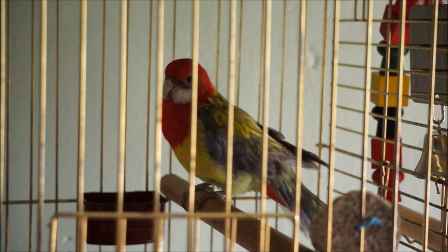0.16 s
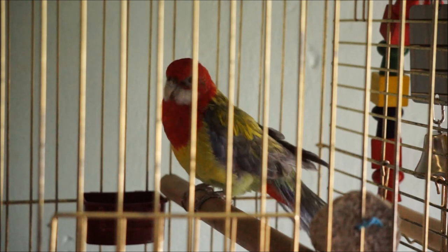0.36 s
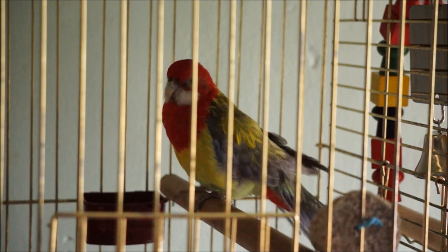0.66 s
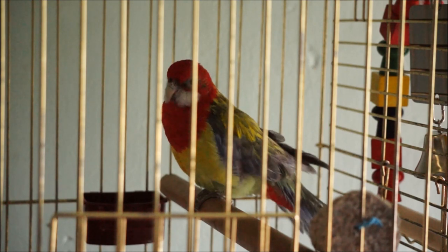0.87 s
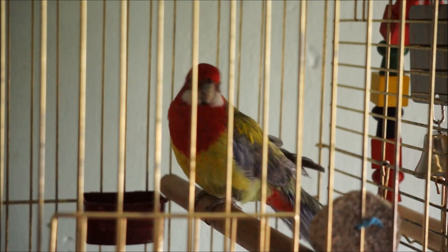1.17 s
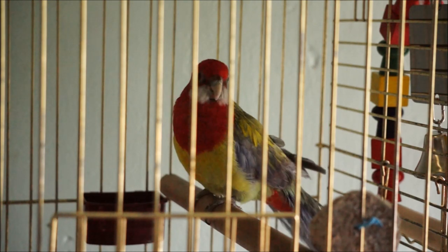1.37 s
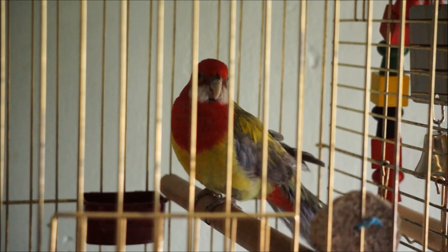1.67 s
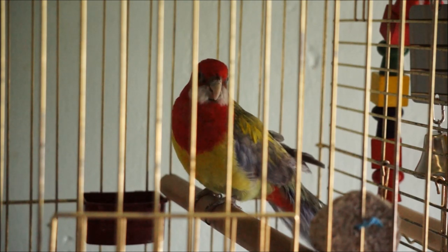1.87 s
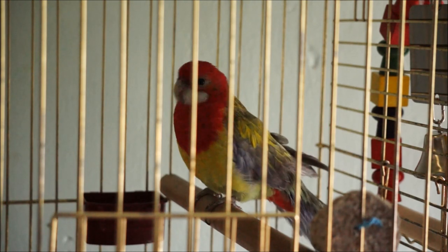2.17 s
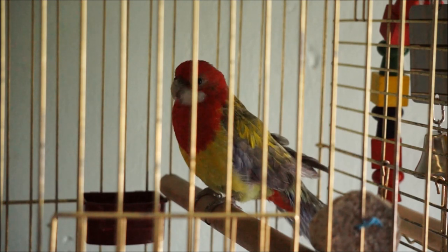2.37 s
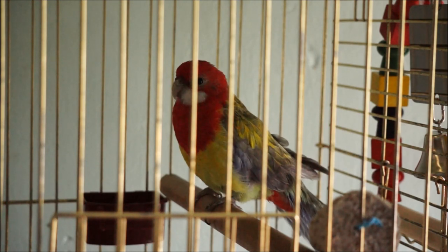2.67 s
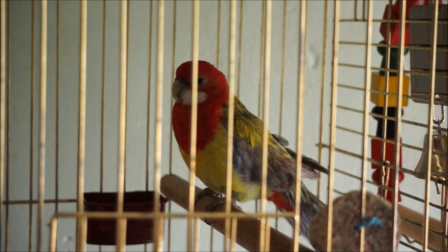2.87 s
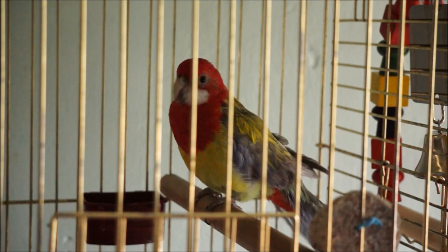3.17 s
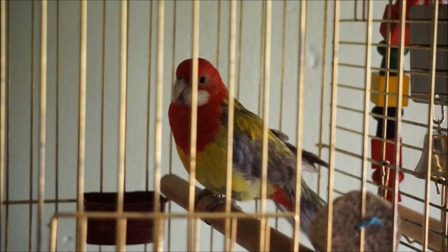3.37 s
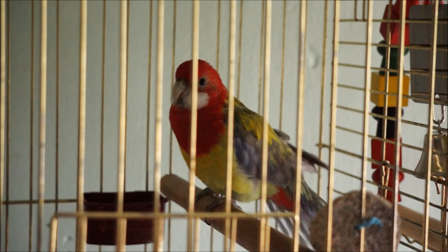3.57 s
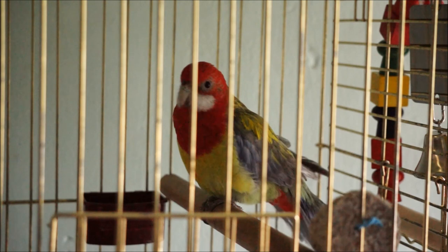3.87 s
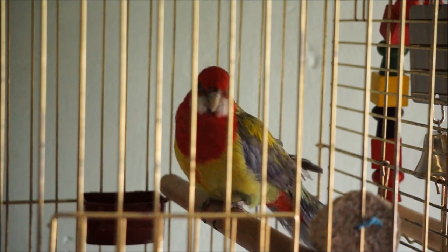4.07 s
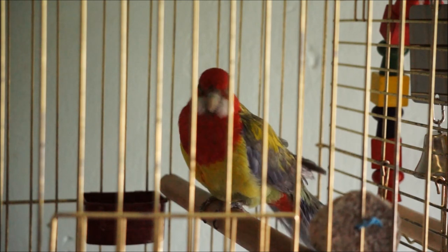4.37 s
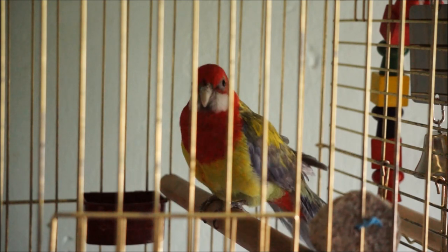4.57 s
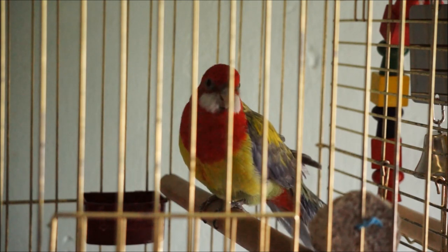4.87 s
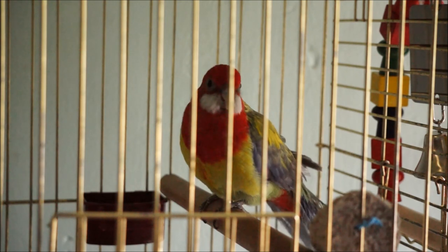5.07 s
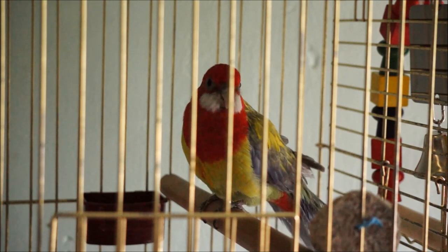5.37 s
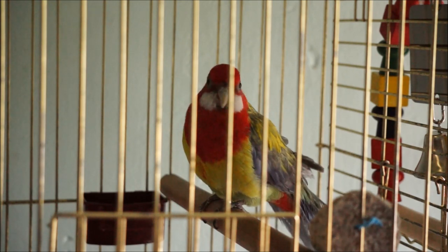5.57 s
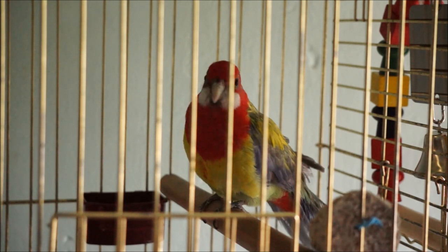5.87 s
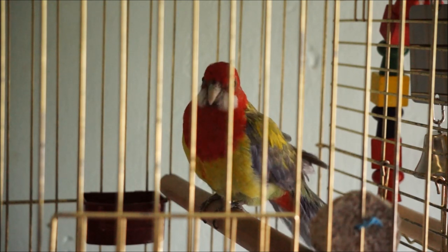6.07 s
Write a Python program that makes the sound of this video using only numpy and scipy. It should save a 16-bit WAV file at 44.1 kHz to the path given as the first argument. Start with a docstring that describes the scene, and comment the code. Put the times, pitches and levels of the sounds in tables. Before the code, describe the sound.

A parrot calls from its cage, close to a stereo microphone in a small quiet room with a very faint hush. At 0 s a sharp chirp sounds with a soft pure whistle, another chirp follows at 0.13, then sliding squawks and harsh rasps alternate until about 0.8. A gentle whistle swells around 0.9. A rasp at 1.35 leads into three longer, nasal, two-step squawks from 1.5 to 2.05, with whistle again near 2.1. The bird then pauses for about a second. A soft whistle at 3.05 opens five bright chirps, each breaking into a hoarse warble, until 3.85. Faint whistles come around 4.1 to 4.25, then rasp, slur, rasp and two nasal drawls from 4.35 to 5.15. Weak whistles fade near 5.3. After a quiet gap, a clear falling squawk at 5.9, a harsh rasp at 6.07 and a soft whistle at 6.2 close it, with short room ring.

```python
"""Caged parrot, quiet room

A parrot chatters in its cage in a small, quiet room, close to a two-port microphone.
Each squawk is a chirp, slur, rasp or drawl: overtones swept by the syrinx, rough when low and clear when high.
Soft, steady whistles, nearly pure tones, come with the first squawk, among the others and after the last.
Cage bars and the room return both, near walls echo the squawks, and a faint hush lies underneath."""
import sys
import numpy as np
from scipy import signal
from scipy.fft import rfft, irfft, next_fast_len
from scipy.io import wavfile
from scipy.ndimage import uniform_filter1d, minimum_filter1d

SR = 44100
rng = np.random.default_rng(int(sys.argv[2]) if len(sys.argv) > 2 else 0)


def store_pcm(level_fs):
    """Save levels as 16-bit WAV."""
    pcm = np.round(np.clip(level_fs, -1, 1) * 32767).astype(np.int16)
    wavfile.write(sys.argv[1], SR, np.atleast_2d(pcm).T)


N = 273861  # length [samples]


def amp(db):
    """Decibels to gain."""
    return 10 ** (np.asarray(db) / 20)


def evened(x):
    """Scales to rms 1."""
    return x / np.sqrt(np.mean(x ** 2) + 1e-20)


def read(points, hz):
    """Reads a table on a log-frequency axis."""
    f, value = np.transpose(points)
    return np.interp(np.log(hz + 1), np.log(f + 1), value)


def add(mix, s, sound):
    """Lays a sound into the mix at time s."""
    part = mix[max(round(s * SR), 0):][:len(sound)]
    part += sound[:len(part)]


def colour(x, points):
    """Filters by a table of (frequency [Hz], gain [dB])."""
    n = x.shape[-1]
    return irfft(rfft(x) * amp(read(points, np.fft.rfftfreq(n, 1 / SR))), n)


def flutter(size, rate_hz):
    """Random wavering up to about rate_hz, rms 1."""
    n = next_fast_len(size)
    hz = np.fft.rfftfreq(n, 1 / SR)
    slow = rfft(rng.standard_normal(n)) / (1 + (hz / rate_hz) ** 2)
    return evened(irfft(slow, n)[:size])


def gesture(rows, attack, release):
    """Joins a call's corners by straight lines: sample numbers, a gate with soft ends, and the columns."""
    s, *columns = np.transpose(rows)
    s = np.maximum.accumulate(s)
    first = max(int((s[0] - attack / 2) * SR), 0)
    last = min(int((s[-1] + release) * SR), N)
    at = np.arange(first, last)
    t = at / SR
    opening = np.clip((t - s[0]) / attack + .5, 0, 1)
    closing = np.clip((s[-1] + release - t) / release, 0, 1)
    return at, opening * closing, [np.interp(t, s, c) for c in columns]


def ports(pair, likeness):
    """Makes two unrelated signals as alike as the two microphone ports hear them."""
    n = pair.shape[-1]
    same = np.clip(read(likeness, np.fft.rfftfreq(n, 1 / SR)), -1, 1)
    a, b = rfft(pair)
    mid = a * np.sqrt((1 + same) / 2)
    side = b * np.sqrt((1 - same) / 2)
    return irfft(np.array([mid + side, mid - side]), n)


# the quiet room and the microphone's hiss, relative spectrum: (frequency [Hz], density [dB per Hz])
HUSH_SPECTRUM = [(15, -17), (30, -0.5), (90, -3), (150, 0.5), (220, -1.5), (400, -1), (800, -2), (1500, -3),
                 (2200, -6.5), (5500, -11.5), (10000, -17.5), (14000, -18.5), (16000, -30.5)]


def hush(level_db=-64, likeness=((100, .9), (400, .65), (3000, .4))):
    """Faint steady room noise and hiss: coloured noise, most alike at the two ports in the bass."""
    pair = rng.standard_normal((2, next_fast_len(N)))
    return amp(level_db) * evened(colour(ports(pair, likeness), HUSH_SPECTRUM)[:, :N])


# swells of the whistle, before its overall trim; octave and overtones [dB] offset the level, ring [dB] too:
# (start [s], rise [s], hold [s], pitch [Hz], level [dB], octave [dB], higher overtones [dB], ring [dB])
WHISTLE_SWELLS = [ (0.0, 0.0015, .012, 1601, -13, -48, 3, -1.5),
                  (0.826, 0.059, .012, 1648, -11.5, -50, -2.5, -13),
                  (0.909, 0.065, .044, 1639, -12.3, -47, 2, -12.5),
                  (2.043, 0.049, .016, 1641, -15, -43, 1.5, -18),
                  (2.112, 0.028, .05, 1646, -19.5, -49, -7, -26), (2.23, .045, .03, 1645, -36, -53, -6, -9),
                  (3.029, 0.05, 0.11, 1626, -15, -53.5, -6, -22),
                  (4.064, .085, 0.021, 1636, -24.5, -40.5, 1.5, -4.5),
                  (4.165, 0.034, .028, 1640, -30, -17, -2.5, -9),
                  (4.229, 0.022, 0.011, 1644, -27, -30, -4.5, -4.5),
                  (5.152, 0.046, 0.1, 1659, -33.5, -13.5, -8, -12.5),
                  (5.273, .03, .025, 1638, -23.5, -24, 0, -4), (5.31, .04, .07, 1637, -33, -39.5, -9, -12),
                  (6.168, 0.054, .012, 1670, -21.5, -26, 0, -15), ]
# the 3rd to 6th partials against the fundamental, before each swell's overtone offset: (level [dB])
WHISTLE_OVERTONES = [-44, -57, -48, -61]


def whistles(level_db=-1, jitter=0.0031, attack=0.0038, swell_from_db=-22.5, stop_db_per_s=380,
             ring_db_per_s=140):
    """One nearly pure tone near one pitch swells, holds, stops quickly and leaves a weaker, slower ring."""
    t, gains = np.arange(N) / SR, np.zeros((3, N))
    for s, rise, hold, _, db, octave_db, higher_db, ring_db in WHISTLE_SWELLS:
        at = (t >= s) & (t < s + 1)
        age = t[at] - s
        after = np.maximum(age - rise - hold, 0)
        swell_db = swell_from_db * np.clip(1 - age / rise, 0, 1) ** 2
        fade_db = np.maximum(-stop_db_per_s * after, ring_db - ring_db_per_s * after)
        level = np.minimum(age / attack, 1) * amp(db + swell_db + fade_db)
        swell = [level, amp(octave_db) * level, amp(higher_db) * level]
        gains[:, at] = np.maximum(gains[:, at], swell)
    # each pitch stands from the swell's start to the end of its hold, then glides to the next
    held = [(s + lag, hz) for s, rise, hold, hz, *_ in WHISTLE_SWELLS for lag in (0, rise + hold)]
    hz = np.interp(t, *np.transpose(sorted(held)))
    phase = 2 * np.pi * np.cumsum(hz * (1 + jitter * flutter(N, rate_hz=80))) / SR
    first, octave, higher = gains
    partials = [first, octave] + [higher * amp(db) for db in WHISTLE_OVERTONES]
    tone = sum(gain * np.sin((k + 1) * phase) for k, gain in enumerate(partials))
    return amp(level_db) * np.sqrt(2) * tone


# the windpipe's resonance, on the fundamental and the octave: (frequency [Hz], gain [dB])
WINDPIPE_RESONANCE = [(850, -10), (1050, -13), (1250, -12), (1450, -4.5), (1700, -2.5), (2100, 0.5),
                      (2400, -2), (2800, 0.5), (3200, -3), (3600, -8), (4100, -24), (4600, -28.5),
                      (5500, -21.5)]


def syrinx(corners, throat, air_colour, rasp_db, low_hz, jitter, clear_hz, half_db=-60, buzz_db=-0.5,
           shimmer=0.079, uneven_db=3.0, clear_share=0.11, burst=0.97, burst_s=.006):
    """The syrinx sweeps a stack of overtones; at low pitch its membranes beat unevenly and air rasps through."""
    out, under, k = np.zeros(N), np.zeros(N), np.arange(1, 17)[:, None]
    at, gate, (hz, effort, lean, buzz) = gesture(corners, attack=.003, release=.006)
    first = effort + read(WINDPIPE_RESONANCE, hz)
    octave = effort + lean + read(WINDPIPE_RESONANCE, 2 * hz)
    waver, tremble = flutter(len(at), rate_hz=300), flutter(len(at), rate_hz=570)
    air_points = [(500, -6.5), (1100, 2.5), (2600, 14.5)] + list(air_colour)
    air = evened(colour(rng.standard_normal(len(at)), air_points))
    # roughness sinks from 1 to clear_share as the pitch climbs past clear_hz
    rough = clear_share + (1 - clear_share) / (1 + (hz / clear_hz) ** 10)
    phase = 2 * np.pi * np.cumsum(hz * (1 + jitter * rough * waver)) / SR
    partial_db = np.vstack([first, octave, buzz + buzz_db + read(throat, k[2:] * hz)])
    # the shape of the beat keeps changing, so each overtone swells and sinks on its own
    drift = uniform_filter1d(uniform_filter1d(rng.standard_normal(partial_db.shape), size=200), size=200)
    partial_db = partial_db + uneven_db * rough * evened(drift)
    audible = k * hz < SR / 2  # no partials above half the sample rate
    voice = np.sqrt(2) * (amp(partial_db) * audible * np.sin(k * phase)).sum(0)
    puff = 1 + burst * np.exp(-(at - at[0]) / SR / burst_s)  # air bursts through as the syrinx opens
    hiss = amp(buzz + rasp_db) * rough * puff * air
    add(out, at[0] / SR, gate * (voice * (1 + shimmer * rough * tremble) + hiss))
    # strong and weak beats alternate a little: a faint line at half the pitch
    add(under, at[0] / SR, gate * rough * amp(octave + half_db) * np.sin(phase / 2))
    # so small a beak radiates no bass
    no_bass = signal.butter(8, low_hz, "high", fs=SR, output="sos")
    return signal.sosfilt(no_bass, out + 1e-18) + under


# Call tables give nominal pitches and levels, which the corners below shift a little; levels are taken
# before windpipe, throat and overall trim. Octave [dB] offsets the fundamental; buzz [dB] is the higher overtones.


def chirp(s, note_s, warble_s, entry_hz, note_hz, warble_hz, note_db, warble_db, note_octave_db, octave_db,
          buzz_db, settle_s=0.0083, break_s=.005, dip=.89, sag=0.73):
    """The note settles, breaks downward, and warbles in one arch.

    Corners, as in every call: (time [s], pitch [Hz], effort [dB], octave [dB], buzz [dB])."""
    snap = s + note_s
    settled_hz = note_hz + 0.19 * (entry_hz - note_hz)
    return [(s, entry_hz, note_db - 1.5, note_octave_db - 6.5, buzz_db - 3),
            (s + settle_s, settled_hz, note_db + .5, note_octave_db - 0.5, buzz_db - 1.0),
            (snap, note_hz, note_db, note_octave_db, buzz_db + 4.5),
            (snap + break_s, warble_hz * .98, warble_db + 1.5, octave_db - 4.5, buzz_db - 2),
            (snap + 2 * break_s, warble_hz * dip, warble_db - .5, octave_db + 3.0, buzz_db + .5),
            (snap + .47 * warble_s, warble_hz, warble_db, octave_db + 0.5, buzz_db + 0.23),
            (snap + 0.89 * warble_s, warble_hz * .93, warble_db + .8, octave_db, buzz_db - 1.9),
            (snap + warble_s, warble_hz * sag, warble_db - 2.5, octave_db, buzz_db - 11)]


# chirps: (start [s], note [s], warble [s], entry [Hz], note [Hz], warble [Hz], note [dB], warble [dB],
# note's octave [dB], warble's octave [dB], buzz [dB], half-pitch line against the octave [dB])
CHIRP_CALLS = [ (0.0, .02, .044, 2151, 2129, 1686, -11, -10, -3.5, -27, -36.5, -62.5),
               (.133, 0.029, .046, 2227, 1968, 1527, -9.5, -14, 6, -1, -29.5, -59),
               (3.148, .022, .048, 2202, 2158, 1543, -13.5, -12, -12, -9, -34.5, -59.5),
               (3.286, .03, .044, 2260, 2234, 1604, -4, -14, -1, -0.5, -28, -58),
               (3.427, .029, .048, 2314, 2273, 1520, -5.5, -16.5, -0.5, 2.5, -29, -47),
               (3.576, 0.027, .058, 2222, 1994, 1453, -7, -16, 6.5, 3.5, -26.5, -38),
               (3.736, .028, .053, 2260, 2021, 1447, -10, -17.5, 8, 3, -28, -58), ]
# throat and beak on a chirp's higher overtones: (frequency [Hz], gain [dB])
CHIRP_COLOUR = [(4000, 0.5), (4700, -13), (5500, -26), (6400, -17.5), (7300, -15.5), (8400, 2.5),
                (9800, -9.5), (11500, -1), (12700, -6), (13800, -23), (15500, -28)]


def chirps():
    """A loud clear note breaks down into a hoarse warble as the pitch falls below the clear register."""
    return sum(syrinx(chirp(*row), CHIRP_COLOUR, CHIRP_COLOUR, rasp_db=-8, low_hz=1250, jitter=.015,
                      clear_hz=1780, half_db=half_db)
               for *row, half_db in CHIRP_CALLS)


def slur(s, flick_s, glide_s, top_hz, middle_hz, end_hz, flick_db, glide_db, octave_db, scratch_db, buzz_db,
         start_hz=915, leap_hz=1240, settle_s=.007, droop_s=.012, droop=.91):
    """The pitch climbs, leaps into the clear register, slides down, and droops as the voice closes."""
    top = s + flick_s
    return [(s, start_hz, flick_db - 2, 0, scratch_db - 5.5),
            (s + 0.65 * flick_s, leap_hz, flick_db + 1.5, -2.5, scratch_db + 1.0),
            (top, top_hz * 0.85, glide_db - 1.5, octave_db + 3, scratch_db - 2.0),
            (top + settle_s, top_hz, glide_db - 3.5, octave_db + 3.5, buzz_db - 2.0),
            (top + .5 * glide_s, middle_hz, glide_db + 0.93, octave_db, buzz_db - .3),
            (top + glide_s - droop_s, end_hz, glide_db + 0.51, octave_db - 3.0, buzz_db - .4),
            (top + glide_s, end_hz * droop, glide_db - 2.0, octave_db - 8.5, buzz_db - 5.5)]


# slurs: (start [s], flick [s], glide [s], top [Hz], middle [Hz], end [Hz], flick [dB], glide [dB],
# octave [dB], scratch: the flick's buzz [dB], buzz [dB])
SLUR_CALLS = [ (.273, .018, 0.079, 2114, 1913, 1836, -16.5, -13, -11.5, -37.5, -34.5),
              (.579, .019, 0.089, 2080, 1873, 1810, -17.5, -15, -15.5, -35, -37),
              (4.484, .019, .08, 2082, 1875, 1753, -17.5, -15, -9, -29.5, -35),
              (5.904, .013, .092, 2028, 1923, 1880, -25.5, -17.5, -25.5, -57, -45.5), ]
# throat and beak on a slur's higher overtones: (frequency [Hz], gain [dB])
SLUR_COLOUR = [(3000, 8.5), (4000, 1.5), (5500, -12), (6700, -10), (7900, 3), (9600, -13.5), (11400, 6),
               (12600, -7.5), (13800, -14), (15500, -13)]
# throat and beak on a rasp's higher overtones, also on a slur's air: (frequency [Hz], gain [dB])
RASP_COLOUR = [(3100, 10), (4100, -1), (5100, 2), (6300, 1.5), (7200, -0.5), (8300, 3.5), (9600, -5),
               (11300, -0.5), (12600, -8), (13800, -16.5), (15500, -22)]


def slurs():
    """A scratchy flick upward, full of rasping air, then a clear falling glide."""
    return sum(syrinx(slur(*row), SLUR_COLOUR, RASP_COLOUR, rasp_db=13, low_hz=760, jitter=.0083,
                      clear_hz=1453, clear_share=.02)
               for row in SLUR_CALLS)


def gaped(throat, gape_db, trade=0.37, shut_hz=4100, open_hz=5700, width_hz=1000):
    """An opening beak shifts resonance upward: the upper one gains gape_db, the lower loses a share of it."""
    hz = np.geomspace(3000, 16000, num=60)
    shut = np.exp(-((hz - shut_hz) / width_hz) ** 2)
    opened = np.exp(-((hz - open_hz) / width_hz) ** 2)
    return list(zip(hz, read(throat, hz) + gape_db * (opened - trade * shut)))


def rasp(s, length, drone_hz, top_hz, shelf_hz, end_hz, drone_db, fall_db, octave_db, drone_buzz_db, buzz_db,
         top_db=-16, top_s=.004, slowing=.34, drone_end_s=0.013, flick_top_s=.021, shelf_start_s=.029,
         shelf_end_s=.042):
    """The drone swells and flicks up; from the shelf the pitch falls, fast at first and then slower."""
    top, shelf_end, end = s + flick_top_s, s + shelf_end_s, s + length
    bend = shelf_end + 0.34 * (end - shelf_end)
    bend_hz = end_hz + slowing * (shelf_hz - end_hz)
    return [(s, drone_hz * .99, drone_db - 3.5, 0, drone_buzz_db - 5),
            (s + drone_end_s, drone_hz * 1.01, drone_db, 0, drone_buzz_db),
            (top - top_s / 2, top_hz * 0.88, top_db, -1.5, buzz_db + 0.37),
            (top + top_s / 2, top_hz * .96, top_db, -1.5, buzz_db - .4),
            (s + shelf_start_s, shelf_hz, fall_db, octave_db, buzz_db + .3),
            (shelf_end, shelf_hz * .995, fall_db + 0.5, octave_db + 1, buzz_db - .3),
            (bend, bend_hz, fall_db - .8, octave_db - 4, buzz_db - 1.5),
            (end, end_hz, fall_db - 5.5, octave_db - .8, buzz_db - 13)]


# rasps: (start [s], length [s], drone [Hz], top [Hz], shelf [Hz], end [Hz], drone [dB], fall [dB],
# octave [dB], drone's buzz [dB], buzz [dB], gape [dB])
RASP_CALLS = [ (0.432, 0.075, 1027, 2919, 1625, 1183, -14, -17, 3, -25, -25, 2),
              (0.75, .071, 1044, 2747, 1588, 1188, -14.5, -16.5, 3, -28.5, -26, 2),
              (1.347, .078, 936, 2832, 1725, 1318, -29, -16, -3, -46, -36.5, -3.5),
              (4.343, 0.083, 912.6, 2756, 1740, 1211, -24, -17.5, 5.5, -45.5, -30, -10.5),
              (4.644, 0.067, 1030, 2643, 1577, 1195, -15.5, -18, 8.5, -26, -26, -14.5),
              (6.07, 0.061, 1017, 2926, 1542, 1215, -15.5, -14, -0.5, -31, -25.5, 0), ]


def rasps():
    """A low drone, a flick to the top of the voice, a shelf and a harsh fall, each with its own gape."""
    calls = np.zeros(N)
    for *row, gape_db in RASP_CALLS:
        throat = gaped(RASP_COLOUR, gape_db)
        calls += syrinx(rasp(*row), throat, throat, rasp_db=-4.5, low_hz=860, jitter=.011, clear_hz=2580)
    return calls


def drawl(s, length, shelf_s, start_hz, low_hz, crest_hz, shelf_hz, tail_hz, rise_db, shelf_db, tail_db,
          rise_buzz_db, buzz_db, climb=.2, thin_db=-8, drop_s=0.0052, crest_s=.043, step_s=.014):
    """The pitch climbs ever faster, thins past the crest, rests on a shelf and a tail, and drops at the close."""
    crest, step, end = s + crest_s, s + shelf_s, s + length
    climb_hz = low_hz + climb * (crest_hz - low_hz)
    return [(s, start_hz, rise_db - 8, -1.5, rise_buzz_db - 5.5),
            (s + .29 * crest_s, low_hz, rise_db + 1.0, -.3, rise_buzz_db),
            (s + .58 * crest_s, climb_hz, rise_db - .6, .3, rise_buzz_db - 4),
            (crest, crest_hz, rise_db - 7.5, 4, rise_buzz_db - 6.5),
            (crest + .6 * step_s, (crest_hz + shelf_hz) / 2, shelf_db + thin_db, -3, buzz_db - 15),
            (crest + 1.6 * step_s, shelf_hz, shelf_db + .3, -1.5, buzz_db - 1.5),
            (step, shelf_hz * .985, shelf_db + 0.32, -1.5, buzz_db + 0.65),
            (step + step_s, tail_hz * 1.04, tail_db - 6.5, -1.5, buzz_db - .3),
            (step + 2 * step_s, tail_hz, tail_db + 1.1, -.8, buzz_db - 1.0),
            (end - drop_s, tail_hz * .985, tail_db + .3, -1.5, buzz_db - 8.5),
            (end, tail_hz * .77, tail_db - 8.5, -4, buzz_db - 13.5)]


# drawls: (start [s], length [s], shelf's end after the start [s], start [Hz], low [Hz], crest [Hz], shelf [Hz],
# tail [Hz], rise [dB], shelf [dB], tail [dB], rise's buzz [dB], buzz [dB], gape [dB])
DRAWL_CALLS = [ (1.497, 0.13, 0.074, 863.6, 1065, 1832, 1640, 1219, -11.5, -12.5, -17.5, -30, -34.5, 0.5),
               (1.694, 0.14, 0.084, 1123, 1003, 1770, 1520, 1188, -11, -20.5, -19.5, -25.5, -36.5, 6),
               (1.91, 0.14, .072, 887, 1074, 1752, 1488, 1139, -14, -19, -20, -30.5, -37, 7),
               (4.799, .13, .072, 930, 1034, 1782, 1486, 1138, -17.5, -19.5, -25.5, -30, -40, 1),
               (5.016, .137, 0.073, 1013, 1203, 1868, 1735, 1229, -17, -18.5, -23, -36.5, -41.5, 0.5), ]
# throat and beak on a drawl's higher overtones: (frequency [Hz], gain [dB])
DRAWL_COLOUR = [(3200, 15), (4000, 8), (5000, 4), (6100, -7), (7200, -9.5), (8400, 0.5), (9800, -8.5),
                (11500, 3.5), (13000, -11.5), (15500, -20)]


def drawls():
    """A slow nasal rise, then down by two steps, each with its own gape."""
    calls = np.zeros(N)
    for *row, gape_db in DRAWL_CALLS:
        throat = gaped(DRAWL_COLOUR, gape_db)
        calls += syrinx(drawl(*row), throat, throat, rasp_db=-5.5, low_hz=790, jitter=.0105, clear_hz=2018,
                        buzz_db=-2.3, uneven_db=3.6)
    return calls


def squawks(level_db=0.15):
    """All four kinds of call, each with its own throat and roughness."""
    return amp(level_db) * (chirps() + slurs() + rasps() + drawls())


# what the cage bars scatter, mostly treble: (frequency [Hz], gain [dB])
BAR_SCATTER = [(800, -18.5), (2000, -11.5), (3200, -7), (4500, -2), (7000, -8.5), (9000, -13), (13000, -6)]


def cage(x, first=.0004, last=0.0036, count=14):
    """Bars and toys scatter within milliseconds; sweeping overtones run through the comb made at each port."""
    taps = np.zeros((2, 1024))
    for port in taps:
        delays = (rng.uniform(first, last, count) * SR).astype(int)
        port[delays] = rng.choice([-1, 1], count) / np.sqrt(count)
    return signal.oaconvolve(colour(x, BAR_SCATTER)[None], taps, axes=1)[:, :N]


# first echoes from the walls around the cage, at the nearer port: (delay [s], level [dB])
WALL_ECHOES = [(.0034, -19), (.0058, -18.5), (.0091, -20.5), (.0127, -23.5), (.0183, -15)]


def walls(x, spread=0.00017, far_db=-4):
    """Single early echoes, arriving from left and right in turn, later and weaker at the far port."""
    out = np.zeros((2, N))
    for i, (delay, db) in enumerate(WALL_ECHOES):
        add(out[i % 2], delay, amp(db) * x)
        add(out[1 - i % 2], delay + spread, amp(db + far_db) * x)
    return out


# the room's ring: (frequency [Hz], time to fall by 60 dB [s])
ROOM_DECAY = [(800, 0.3944), (2000, 0.3335), (5500, 0.3465), (12000, 0.2354)]
# its colour: (frequency [Hz], gain [dB])
ROOM_TONE = [(800, 4.5), (1500, 3.3), (2700, 2.5), (4500, 1), (8000, 0), (12000, 2.5)]
# how alike the room sounds at the two ports: (frequency [Hz], likeness [0 to 1])
PORT_LIKENESS = [(800, 1), (2000, 0.45), (4500, .3), (8500, 0.086), (13000, .1)]


def room(x, onset=0.0027):
    """A dense tail of decaying noise, each band dying at its own speed."""
    noise = ports(rng.standard_normal((2, SR)), PORT_LIKENESS)
    hz, t, z = signal.stft(noise, SR, nperseg=256)
    decay = amp(-60 * t / read(ROOM_DECAY, hz)[:, None])
    tail = signal.istft(z * decay, SR, nperseg=256)[1]
    tail *= np.clip(np.arange(tail.shape[1]) / SR / onset - .5, 0, 1)
    tail = colour(tail / np.linalg.norm(tail[0]), ROOM_TONE)
    return signal.fftconvolve(x[None], tail, axes=1)[:, :N]


def scene(squawk_room_db=-7, whistle_room_db=-14):
    """The bird close by, its cage and echoes, and the quiet room."""
    harsh, soft = squawks(), whistles()
    bird = harsh + soft
    ring = room(amp(squawk_room_db) * harsh + amp(whistle_room_db) * soft)
    return bird + cage(bird) + walls(harsh) + ring + hush()


# treble tone, a dip near 13.6 kHz: (frequency [Hz], gain [dB])
TREBLE_TONE = [(12800, 0), (13600, -8), (16000, -2)]
# the two ports' difference in colour: (frequency [Hz], left minus right [dB])
PORT_BALANCE = [(60, 2), (300, -0.5), (700, 1.5), (1500, -1.2), (2800, -1.26), (5000, 2.05), (9000, 0.5),
                (13000, 2)]


def record(dry, ceiling=0.89, edge_hz=16000):
    """The ports differ in colour; the treble is dipped; a limiter holds the highest peaks; then a band limit."""
    size = next_fast_len(N)
    hz = np.fft.rfftfreq(size, 1 / SR)
    lean_db = read(PORT_BALANCE, hz) / 2
    port_db = read(TREBLE_TONE, hz) + np.array([lean_db, -lean_db])
    x = irfft(rfft(dry, size) * amp(port_db), size)[:, :N]
    gain = minimum_filter1d(ceiling / np.maximum(abs(x).max(0), ceiling), size=300)
    x = x * uniform_filter1d(uniform_filter1d(gain, size=150), size=150)
    band = signal.firwin(255, edge_hz, window=("kaiser", 9), fs=SR)
    return signal.oaconvolve(x, band[None], "same")


dry = scene()
out = record(dry)
store_pcm(out)
```